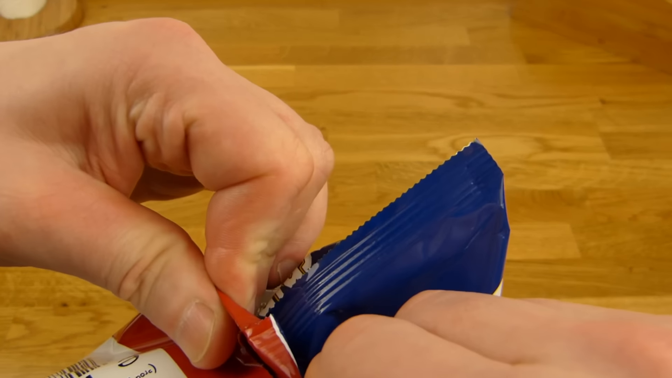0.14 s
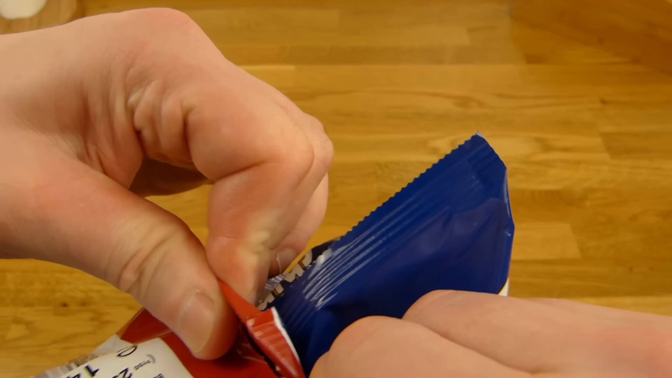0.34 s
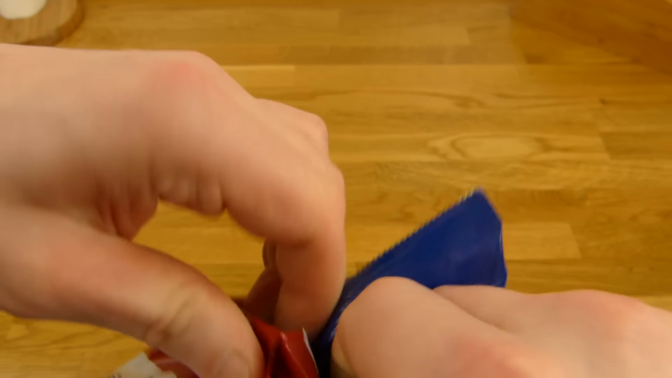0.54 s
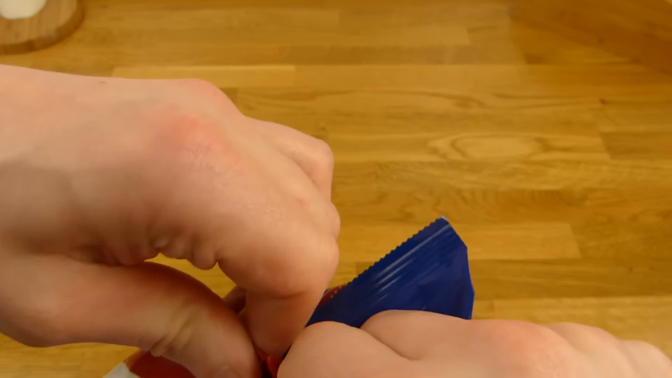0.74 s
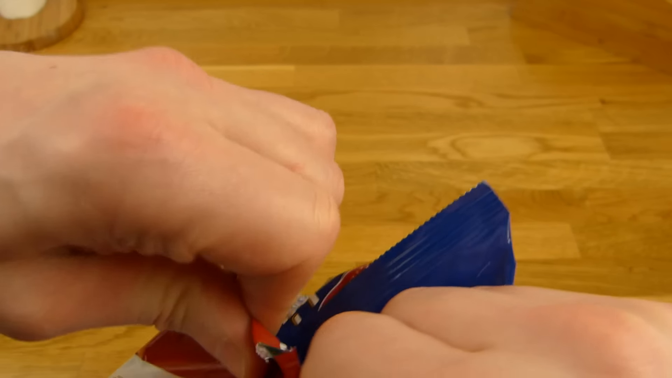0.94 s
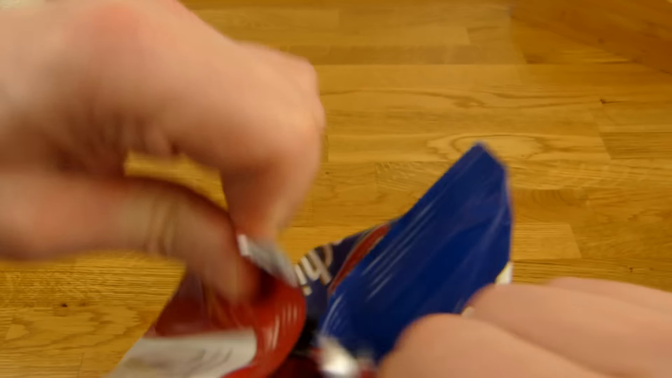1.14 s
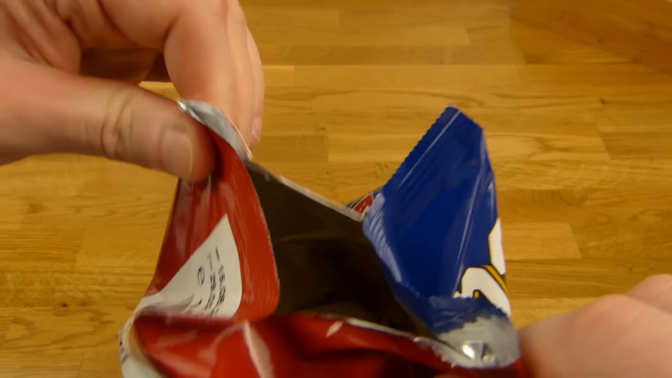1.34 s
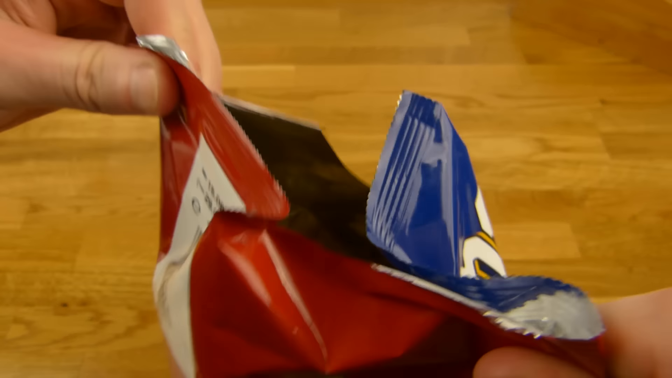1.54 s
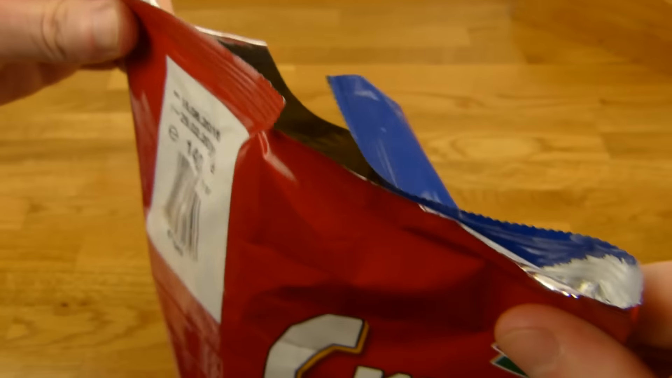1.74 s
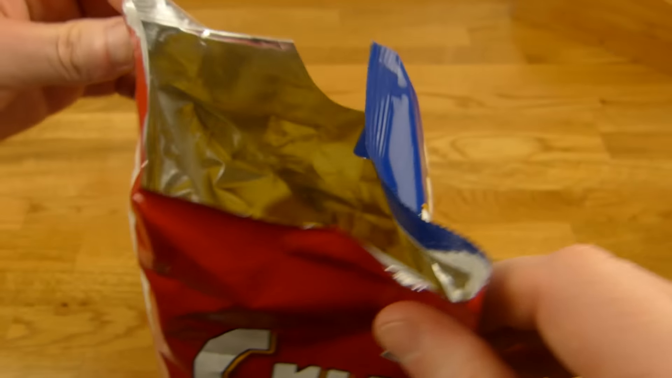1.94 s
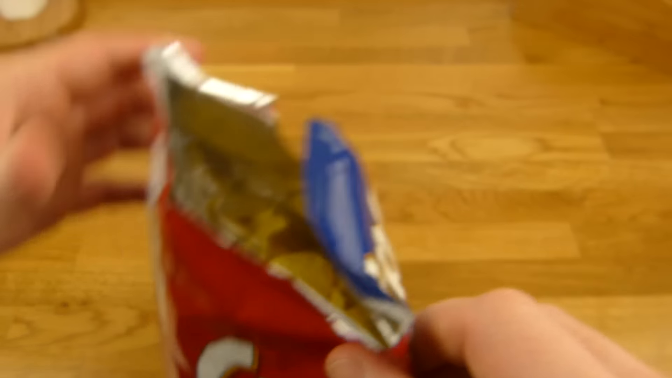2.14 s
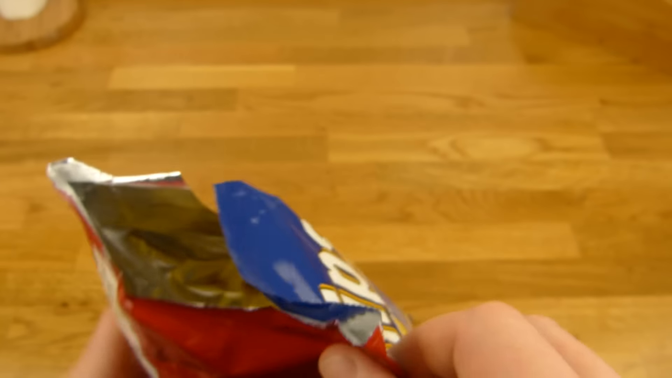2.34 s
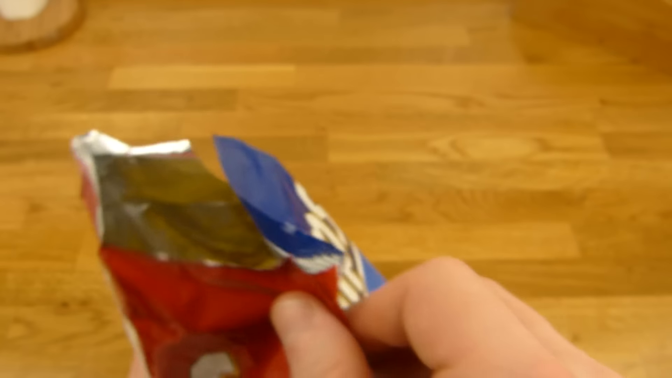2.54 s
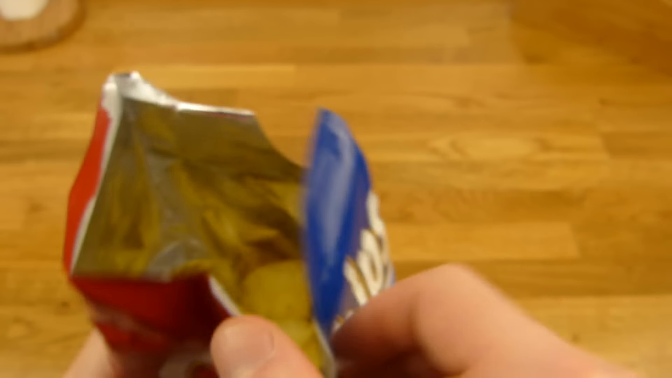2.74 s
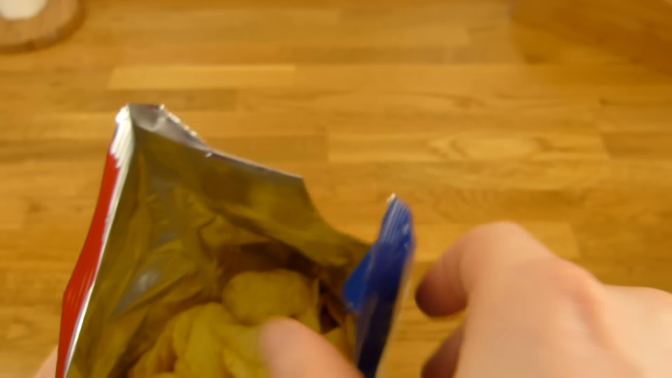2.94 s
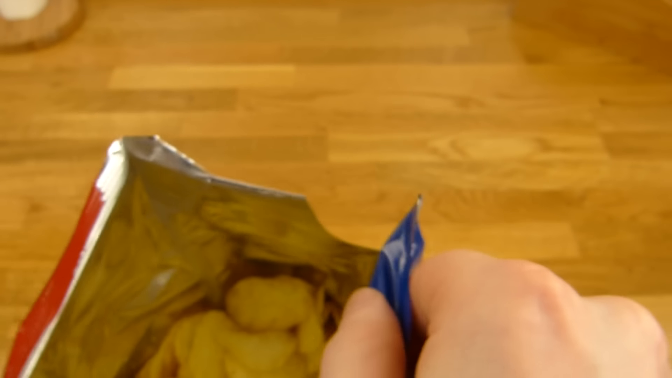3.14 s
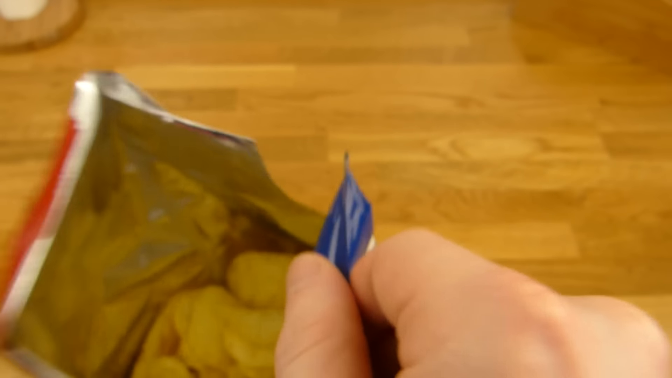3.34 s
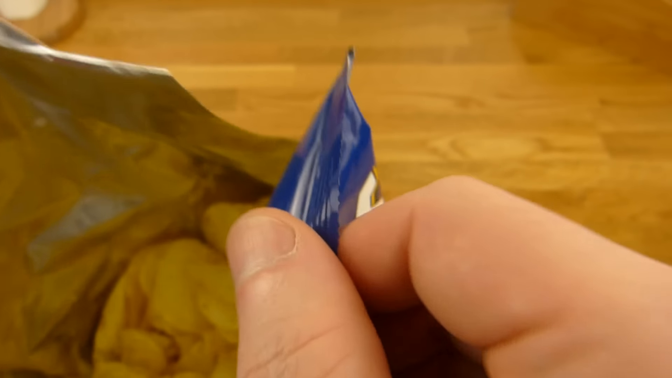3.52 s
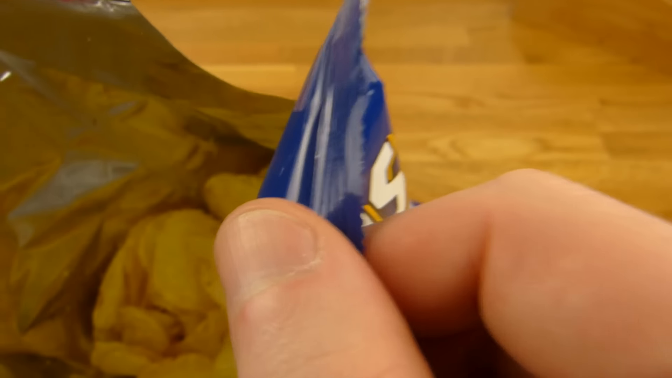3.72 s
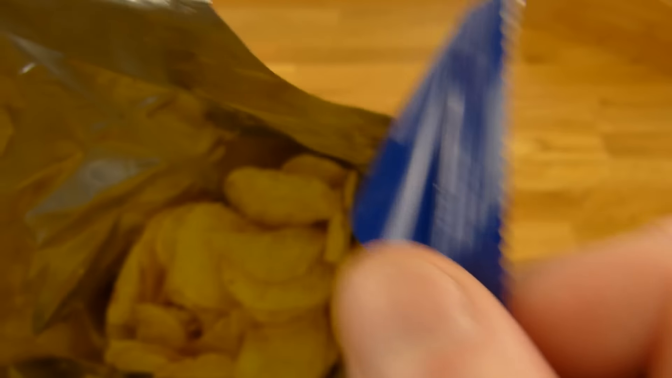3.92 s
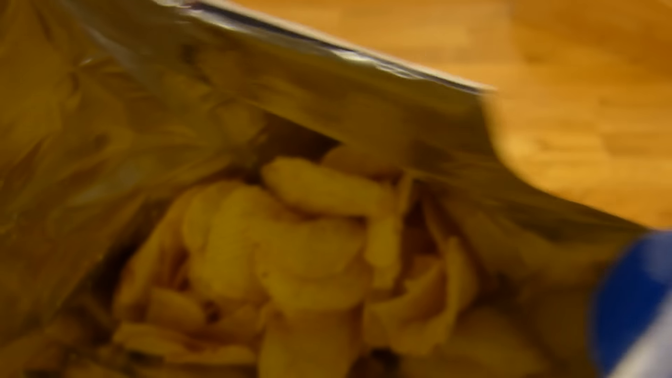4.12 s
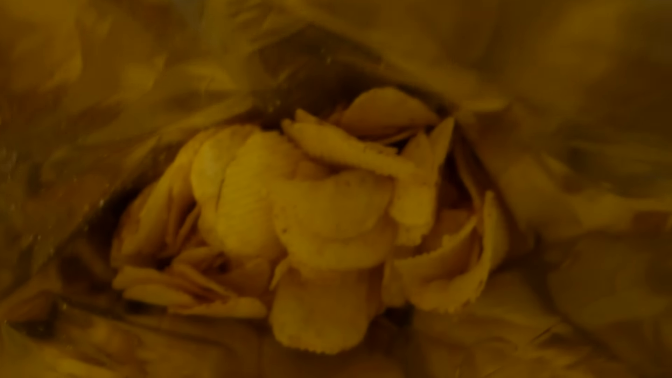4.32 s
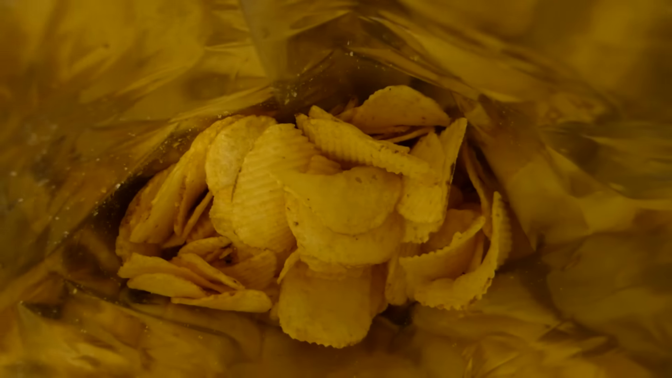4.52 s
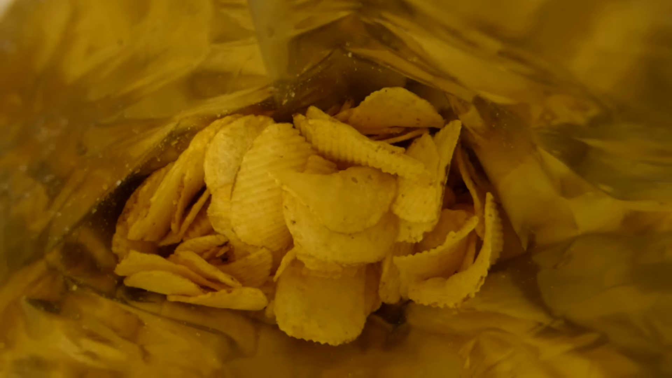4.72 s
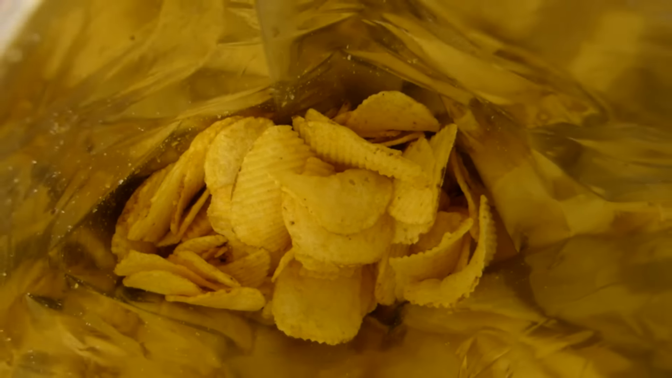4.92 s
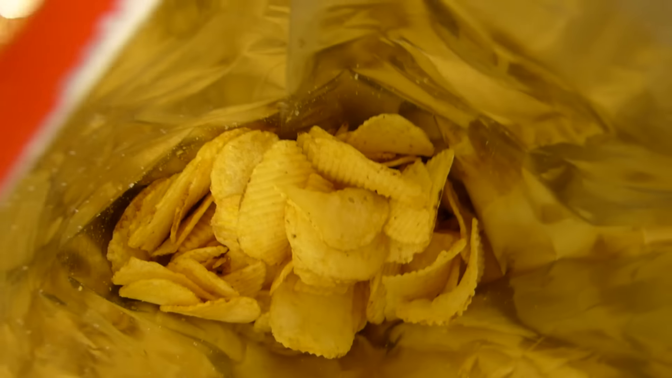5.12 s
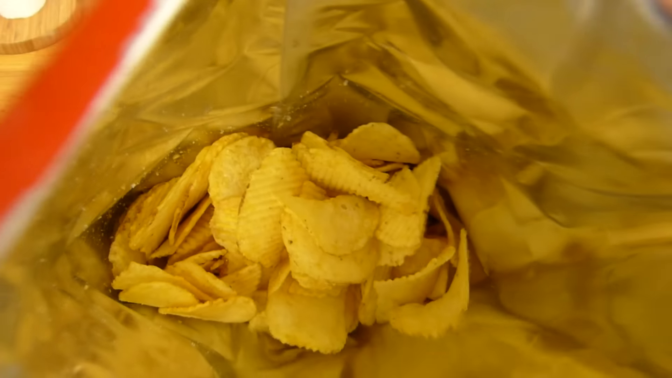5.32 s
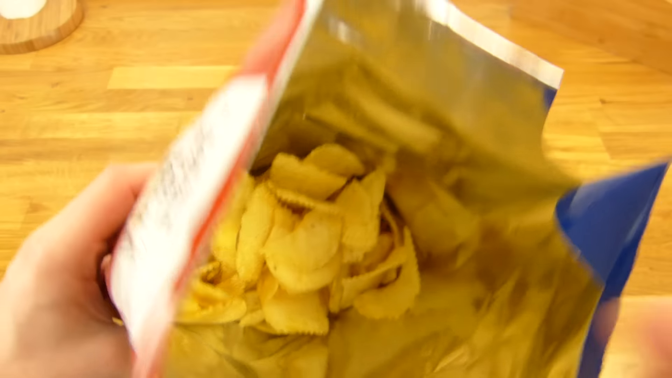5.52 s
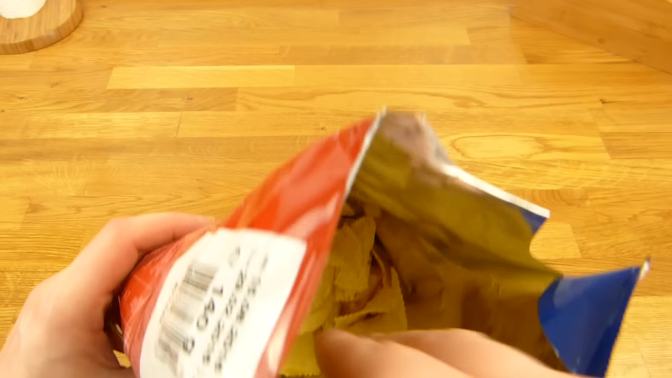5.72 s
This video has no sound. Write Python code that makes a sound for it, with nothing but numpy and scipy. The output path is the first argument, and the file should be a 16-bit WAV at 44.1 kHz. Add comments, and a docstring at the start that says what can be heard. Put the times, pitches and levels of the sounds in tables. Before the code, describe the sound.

Hands rip a crisp packet's seam in a quick zippery fizz, then spread and turn the stiff foil: irregular bright snaps, fine crackle, a few hollow pops and short pings. The bag adds a tight rattle and the small room a short tail. Handling thins out after about three and a half seconds, flares twice briefly, and otherwise leaves quiet room noise.

```python
"""A foil-lined snack packet is torn along its seam, pulled open and turned in the hands close to a stereo microphone.
The seam lets go in fast stick-slip jerks; then creases in the stiff film buckle with sharp snaps over fine crackle,
with hollow pops of panels and pings that ring on from some snaps. Each event is a click that rings short resonances.
The clicks hum and rattle in the bag and die away in a small furnished room, over steady background noise."""
import sys
import numpy as np
from scipy import signal
from scipy.io import wavfile

SR = 44100
rng = np.random.default_rng(int(sys.argv[2]) if len(sys.argv) > 2 else 0)


def transcribe(u):
    """Save the signal u as a 16-bit wav file named by the first command-line argument.

    u: samples, shape (n,) or (channels, n), limited to [-1, 1]; the rate is SR.
    q: integer samples, one column per channel.
    """
    v = np.clip(np.atleast_2d(u).T, -1, 1)
    q = np.round(v * 32767).astype(np.int16)
    wavfile.write(sys.argv[1], SR, q)


N = 254456

SEAM_END_S = .44   # until then the crackle is finer and brighter

# the packet moves about: most to the left near 3.7 s, slightly right near 5.45 s, then centred:
# (time [s], left-right difference [dB])
LEAN = [(0, 0.5), (1.3, 0.6), (2.3, 0.8), (3.0, 0.7), (3.7, 2.5), (4.3, 0.3), (5.0, 0), (5.45, -1),
        (5.77, 0)]


def from_db(db):
    """Turn decibels into an amplitude gain."""
    return 10 ** (np.asarray(db) / 20)


def rms_one(x):
    """Scale to rms 1."""
    return x / np.sqrt(np.mean(x ** 2) + 1e-20)


def at_hz(points, hz):
    """Read a (frequency [Hz], value) table on a log frequency axis."""
    table_hz, values = np.transpose(points)
    return np.interp(np.log(hz), np.log(table_hz), values)


def drift(rate_hz):
    """Slow random wander of rms 1: white noise twice through a one-pole low-pass."""
    r = np.exp(-2 * np.pi * rate_hz / SR)
    wander = signal.lfilter([1], [1, -2 * r, r * r], rng.standard_normal(N + SR))
    return rms_one(wander[SR:])   # the filter has settled by then


def ring(clicks, hz, cycles):
    """A resonance passed twice: a unit click swells to about 1, then dies; each pass loses 60 dB in these cycles."""
    r, w = from_db(-60 * hz / (cycles * SR)), 2 * np.pi * hz / SR
    poles = [1, -2 * r * np.cos(w), r * r]
    passes = [[0.924, 0.015, -0.976, *poles], [0.0084, np.sin(w), -0.0219, *poles]]
    return -np.e * np.log(r) * signal.sosfilt(passes, clicks)


def seam():
    """Stick-slip jerks of the tearing seam ring the taut film; as it slackens, the balance of its pitches falls."""
    # jerks slow down and speed up again: (time [s], rate [jerks per s])
    slip_rate = [(0, 282), (.036, 333), (.044, 250), (.062, 205), (.085, 71), (.128, 111), (.155, 72),
                 (.178, 77), (.195, 108), (.234, 155), (.246, 62), (.29, 287), (.302, 104), (.32, 278)]
    # the jerks weaken as the tear ends: (time [s], level [dB])
    slip_level = [(0, 0.5), (.17, 1.5), (.19, -1), (.32, -5)]
    # film at the tear: (pitch [Hz], level at first [dB], level once slackened [dB])
    seam_rings = [(3070, -24, -30), (6200, -35, -13.5), (7340, -16.5, -18.5), (8000, -15, -27),
                  (10300, -30, -27.5), (11800, -37, -29)]
    start, spread_db = .2, 1.5   # share of a jerk already under way; chance in jerk level
    slack_s, cycles = .11, 8.3   # time to slacken; ringing length

    s, rate = np.transpose(slip_rate)
    time = np.arange(s[-1] * SR) / SR
    jerks = np.cumsum(np.interp(time, s, rate)) / SR + start
    at = np.flatnonzero(np.diff(np.round(jerks)))
    size_db = spread_db * rng.standard_normal(len(at)) + np.interp(at / SR, *np.transpose(slip_level))
    out = 0
    for hz, taut_db, slack_db in seam_rings:
        level_db = np.interp(at / SR, [0, slack_s], [taut_db, slack_db])
        clicks = np.full(N, 1e-18)
        clicks[at] = from_db(level_db + size_db)
        out = out + ring(clicks, hz, cycles)
    return out


def handling(t):
    """Crackle treble, middle and low at times t: tugs and squeezes add up in power, the strongest sets the tone."""
    # each tug or squeeze swells and fades: (time of peak [s], treble level [dB], swell [s], fade [s],
    # middle relative to treble [dB], low relative to middle [dB])
    squeezes = [(0., -22.5, 0.081, 0.24, -16, -11.5), (.31, -25.5, 0.47, 0.21, -25, -4),
                (0.4, -27.5, 0.34, 0.061, -13, -19), (.557, -33.5, 0.12, 0.65, -11, -5.5),
                (.69, -29, 0.2, 0.47, -5, -2), (0.967, -23.5, 0.19, 0.054, -15.5, -14),
                (1.045, -30.5, 0.039, 0.42, -7.5, -9), (1.245, -24, 0.12, 0.23, -3.5, -9.5),
                (1.487, -31, 0.025, 0.52, -2, -8.5), (1.868, -28, 0.19, 0.07, -6, -5),
                (1.955, -42.5, 0.14, 0.23, 3.5, -6), (2.112, -57, 0.036, 0.18, -41, -3),
                (2.215, -36.5, 0.0232, 0.72, 1.5, -1), (2.324, -28, 0.04, 0.13, -2, -11.5),
                (2.604, -29, 0.11, 0.076, -3, -5.5), (2.74, -24.5, 0.075, 0.23, 0, -9),
                (2.918, -24, 0.1215, 0.04, -2.5, -5.5), (3.123, -32, 0.14, 0.039, -2, -5.5),
                (3.186, -28, 0.0722, 0.15, 1.5, -9.5), (3.345, -31.5, 0.0493, 0.18, 1.5, -7),
                (3.405, -25.5, 0.11, 0.083, -1, -8.5), (3.574, -31, 0.23, 0.13, -6.5, -3.5),
                (3.957, -49, 0.21, 0.12, -1, 2.5), (4.03, -46.5, 0.24, 0.22, -7, -5.5),
                (4.29, -30, 0.1, 0.17, -2.5, -6), (4.495, -47, 0.101, 0.17, -3, -6),
                (5.049, -48, 0.15, 0.49, -5.5, -4), (5.146, -33.5, 0.081, 0.066, -7, -4.5),
                (5.355, -51, 0.42, 0.189, -24, 9), (5.464, -32, 0.17, 0.15, -0.5, -2.5),
                (5.55, -36, 0.094, 0.087, -6.5, -5), (5.77, -53, 0.077, .1, -10, -9)]
    span_db = 20   # a swell or fade covers this much

    s, db, swell, fade, mid, low = np.transpose(squeezes)
    late = t[:, None] - s
    drop_db = span_db * np.maximum(late / fade, -late / swell)
    power = from_db(2 * (db - drop_db)) + 1e-30
    total = power.sum(axis=1)
    return 10 * np.log10(total), power @ mid / total, power @ low / total


def crackle():
    """Small creases give way at random, in drifting clumps and sudden crunches; handling sets loudness and tone."""
    # a fistful of film crunches at once: (time [s], crackle rise [dB], time to 1/e of the rise [s])
    crunches = [(.671, 7.5, 0.00722), (.859, 9.5, 0.0036), (1.542, 6, 0.0077), (2.604, 8, 0.0097),
                (2.801, 3.5, 0.0097), (3.123, 8, 0.004184), (3.182, 7.5, 0.0062), (3.334, 7, 0.0056),
                (3.386, 5.5, 0.006), (3.567, 9.5, 0.0051), (5.467, 10.5, 0.011)]
    base_rate = 800   # clicks per s, before the seam, clumps and crunches change it
    clump_db, spread_db = 3, 3.5   # both shrink while the seam tears
    crunch_thins = .8   # the lows lose this share of a crunch's rise

    t = np.arange(N) / SR
    coarse = np.where(t < SEAM_END_S, .3, 1)   # tearing fizzes more densely and evenly
    crunch_db = sum(db * np.exp(-((t - s) / width) ** 2) for s, db, width in crunches)
    rate = base_rate / coarse * from_db(clump_db * coarse * drift(40) + crunch_db)
    born = np.flatnonzero(rng.random(N) < rate / SR)
    crunch_db, coarse, s = crunch_db[born], coarse[born], t[born]

    db, mid, low = handling(s)
    chance = np.minimum(rng.exponential(1, len(born)), 3) - .5   # many faint, few strong
    level_db = db + crunch_db + spread_db * coarse * chance
    low_db = mid + low - crunch_thins * crunch_db   # relative to treble, like mid
    pan = np.interp(s, *np.transpose(LEAN))
    ring_hz = 500 * 2 ** rng.uniform(0, 4.347, len(born))
    return np.transpose([s, level_db, mid, low_db, pan, ring_hz])   # rows for film()


def film(rows, solid):
    """Clicks ring all patches of film, most those near their own pitch.

    Solid cracks alternate sign from patch to patch, crackle takes random signs.
    """
    # how strongly patches sound: (frequency [Hz], level [dB])
    patch_level = [(90, -41), (150, -36), (250, -27.5), (450, -26), (900, -13.5), (1700, -15.5),
                   (3000, -14), (5000, -10.5), (7500, -7.5), (10000, -16.5), (13000, -42), (15500, -32)]
    # patches lie left or right: (frequency [Hz], mean left-right difference [dB], scatter [dB])
    sides = [(110, -2, 0), (376, 2.5, 9), (690, 0.5, 2.5), (2400, -1, 3.5), (4400, -1, 5),
             (8000, -0.5, 2.5), (12000, -1, -3)]
    # changing highest treble: (time [s], level [dB])
    air_level = [(0, -3), (.2, -3), (.33, 2), (.5, 0), (.75, 4.5), (1.25, 11), (1.75, 6), (2.25, 9),
                 (2.75, 5), (3.25, 6.5), (3.75, -2), (4.25, -1), (5.1, 4), (5.77, -1)]
    # centres of low, middle, treble and air: (frequency [Hz])
    tone_hz = [600, 2200, 6500, 13000]
    seam_air_db, solid_air_db = 9, -4.5   # brighter tear; cracks have less air than crackle
    cycles, favour_db, favour_octaves = 6.77, 6.5, .32   # ringing; lift and width round a click's own pitch
    run_s = .0008 if solid else .00033   # time a crease takes to run across the patches
    spread_db = 3.5 if solid else 2.5
    lead = .8   # low patches start early, so that low and high pitches peak nearly together

    s, db, mid, low, pan, ring_hz = rows.T
    side_hz, side_db, scatter_db = np.transpose(sides)
    air = seam_air_db * (s < SEAM_END_S) + solid_air_db * solid + np.interp(s, *np.transpose(air_level))
    pitches, out = np.geomspace(90, 15500, 32), np.zeros((2, N))
    luck = rng.standard_normal((len(s), len(pitches), 3))   # strength, sign, place
    reached = s[:, None] + run_s * rng.random((len(s), len(pitches)))
    for k, hz in enumerate(pitches):
        early = lead * cycles / (np.log(1000) * max(hz, tone_hz[0] / 2))
        at = np.clip(((reached[:, k] - early) * SR).astype(int), 0, N - 1)

        # the four tone regions cross-fade; treble is the reference, so it adds nothing
        shares = [at_hz(list(zip(tone_hz, row)), hz) for row in np.eye(len(tone_hz))]
        tone_db = shares[0] * low + shares[1] * mid + shares[-1] * air + at_hz(patch_level, hz)
        near_db = favour_db * np.exp(-(np.log2(hz / ring_hz) / favour_octaves) ** 2)
        strength = from_db(db + tone_db + near_db + spread_db * np.tanh(luck[:, k, 0]))
        sign = np.sign(luck[:, 0, 1]) * (-1) ** k if solid else np.sign(luck[:, k, 1])

        place_db = pan + np.interp(hz, side_hz, side_db) + np.interp(hz, side_hz, scatter_db) * luck[:, k, 2]
        left_right = from_db(np.outer([.5, -.5], place_db))
        clicks = np.full((2, N), 1e-18)
        np.add.at(clicks, (slice(None), at), left_right * strength * sign)
        out += ring(clicks, hz, cycles)
    return out


def noise_bands(size):
    """Half-octave bands of stereo noise with the room's left-right likeness: (centre Hz, left and right)."""
    # how alike the two sides are: (frequency [Hz], likeness [0 to 1])
    likeness = [(40, 0.32), (250, 0.044), (1000, 0.66), (4000, 0.7), (8000, 1), (12000, 1)]
    edges = 25 * 2 ** np.arange(0, 9.6, .5)
    white = rng.standard_normal((2, 2, size))   # neighbouring bands use different noise
    for k, (low, high) in enumerate(zip(edges, edges[1:])):
        band = signal.butter(2, [low, high], "band", fs=SR, output="sos")
        mid, side = signal.sosfilt(band, white[k % 2])
        hz = np.sqrt(low * high)
        alike = np.clip(at_hz(likeness, hz), 0, 1)
        yield hz, np.sqrt(1 + alike) * mid + np.sqrt(1 - alike) * side * [[1], [-1]]


def hush():
    """Steady room and microphone noise, shaped band by band."""
    # colour of the noise: (frequency [Hz], relative band gain [dB])
    colour = [(25, 2), (50, -6.5), (120, -1.5), (300, 3.5), (900, -3), (2500, -10.5), (7700, -12.5),
              (16000, -21)]
    level_db = -63   # rms
    noise_sum = sum(from_db(at_hz(colour, hz)) * noise for hz, noise in noise_bands(N))
    return from_db(level_db) * rms_one(noise_sum)


def pops():
    """Hollow pops of panels, and pings that ring on from some loud snaps, each one resonance at its own pitch."""
    # pops and pings: (time [s], peak level [dB], pitch [Hz], cycles to lose 60 dB in each pass of the resonance)
    pops_and_pings = [(0.032, -29, 910, 10), (0.174, -33, 1750, 14), (.648, -29.5, 480, 7.6),
                      (1.1229, -4.5, 4310, 7.7), (1.1878, -8, 2450, 5.3), (1.233, -32, 405, 5),
                      (1.2348, -1, 5900, 13), (1.2355, -10, 2500, 17), (1.465, -32, 397, 5.7),
                      (1.479, -35, 423, 23), (1.539, -32, 430, 8), (1.617, -26, 910, 10),
                      (2.102, -24, 1660, 17), (2.237, -19, 1030, 9), (2.575, -34, 273, 7.6),
                      (3.569, -20, 800, 7.9), (3.696, -25, 770, 10.4), (3.9445, -39, 451, 8.8),
                      (3.9795, -35.5, 782, 7.5), (3.987, -32, 776.5, 8), (4.0055, -37, 750, 9.6),
                      (4.025, -45, 714.4, 7), (4.0655, -37, 850, 5.6), (4.371, -36, 850, 5.6),
                      (4.954, -42, 880, 9), (5.2385, -34, 1360, 24), (5.555, -25, 960, 11)]
    out, size = np.zeros(N + SR), SR // 8
    for s, db, hz, cycles in pops_and_pings:
        at = round(s * SR)
        out[at:at + size] += from_db(db) * ring(signal.unit_impulse(size), hz, cycles)
    return out[:N]


def snaps(count=3):
    """Loud creases buckle, each followed by a few weaker neighbours of like tone; both are rows for film()."""
    # creases: (time [s], treble level [dB], middle relative to treble [dB], pitch [Hz])
    creases = [(0.1758, -14, -5.5, 3850), (0.24, -15, -26, 7520), (0.39, -3, -9.5, 6500),
               (0.5019, -32, -17, 7130), (0.511, -23, -10, 7320), (0.518, -28, -20, 6500),
               (.544, -17, -12, 8020), (0.5515, -15, -3, 6570), (0.5583, -18, 5, 910),
               (0.5842, -7.5, -4.5, 4800), (0.5974, -8.5, -10, 6100), (0.612, -15, 4.5, 1000),
               (0.6308, -13.5, 3, 5200), (0.6508, -22, 4, 4000), (.662, -19, -8, 6500),
               (0.6712, -7, -0.5, 5370), (0.7168, -9.5, -8, 6080), (0.7256, -4.5, -8, 8900),
               (0.785, -15.5, -10, 3960), (0.808, -11.5, -4.5, 4700), (.858, -10.5, 6.5, 7760),
               (0.8746, -12, 0, 5800), (0.9662, -29, -16, 6280), (0.9803, -11.5, -8.5, 3970),
               (1.0331, -4.5, -10.5, 7550), (1.0587, -15, -24, 8460), (1.073, -24.5, 10, 3900),
               (1.097, -21.5, 5, 1820), (1.1138, -22, 5, 6500), (1.1224, -2, -6.5, 4340),
               (1.1716, -12, -1, 2978), (1.1873, -2, -9.5, 4650), (1.192, -10, -26, 7600),
               (1.2295, -26, 5, 2500), (1.2348, -5.5, 2.5, 8300), (1.246, -21.5, 7, 2420),
               (1.251, -19, -8, 7590), (1.268, -9.5, 0, 6700), (1.273, -12, -5, 7560),
               (1.299, -8.5, 1.5, 5800), (1.351, -14.5, -1, 1910), (1.354, -23, 6, 2300),
               (1.389, -10, -10, 8500), (1.394, -17, -1, 8200), (1.429, -27, 6, 7320),
               (1.47, -14, 2.5, 6080), (1.478, -9.5, 3.5, 7100), (1.495, -14.5, -0.5, 2400),
               (1.5215, -17, 9, 6000), (1.5437, -4.5, -7, 7160), (1.592, -7.5, -10, 6200),
               (1.6285, -7.5, -1.5, 7200), (1.6776, -20, -4, 4860), (1.7136, -14, -23, 6030),
               (1.7399, -11.5, -3, 5600), (1.7682, -14, -1.5, 2530), (1.806, -9.5, -6, 8740),
               (1.826, -18.5, 0, 4110), (1.858, -7, -2, 7340), (1.945, -14.5, -18, 4570),
               (1.9778, -20.5, 0.5, 6000), (2.0336, -30, 5, 1630), (2.07, -31.5, -1, 3998),
               (2.102, -8, -16, 1633), (2.204, -13, -5.5, 5170), (2.2379, -17, 4, 1020),
               (2.262, -18.5, -3, 4240), (2.3025, -17.5, 6.5, 2520), (2.3058, -11, -8, 7550),
               (2.3252, -8.5, -15, 5160), (2.358, -15, -15.5, 10000), (2.3688, -13, 4.5, 4720),
               (2.4274, -15.5, -13, 7400), (2.4551, -26, 9, 1290), (2.4934, -21, -4.5, 1094),
               (2.508, -21, 0, 3250), (2.545, -32, 12, 2190), (2.5559, -15.5, 1, 8100),
               (2.5801, -10.5, -2, 1755), (2.597, -21, 10.5, 5960), (2.6064, 0, -15, 9150),
               (2.616, -15, -8, 4970), (2.685, -7, -6, 2397), (2.703, -15.5, 8, 7600),
               (2.735, -6, -12, 7100), (2.764, -24, -22.5, 8000), (2.8022, -12, -3, 4784),
               (2.8782, -11.5, -5, 4130), (2.895, -13.5, -14, 6210), (2.9085, -13, -15, 6500),
               (2.926, -13, -3, 7000), (3.0368, -16.5, 2, 3139), (3.083, -15, 1, 5230),
               (3.119, -7.5, -6, 3880), (3.188, -15, -1, 5400), (3.2247, -7, 0.5, 1800),
               (3.3466, -7, -9, 2600), (3.3829, -6, -2, 1240), (3.4098, -8.5, 0, 5702),
               (3.4968, -19, -7.5, 8800), (3.514, -11.5, -9, 7630), (3.53, -9, -13, 7800),
               (3.5641, -6.5, 0, 5970), (3.618, -26.5, 0, 4000), (3.636, -22, 6, 4154),
               (3.656, -28, 6, 1773), (3.662, -30, 10.5, 1850), (3.6959, -26, 5, 768.3),
               (3.8862, -33.5, -16, 7606), (3.9453, -6.5, -10.5, 4750), (4.0664, -31, -14.5, 900.5),
               (4.0924, -36, 3, 2289), (4.1079, -28, -6, 6460), (4.1689, -25.5, -14, 5470),
               (4.206, -18.5, -2, 5800), (4.2514, -5, -7, 5610), (4.277, -17.5, 0, 2000),
               (4.284, -9.5, -1, 6950), (4.2999, -12.5, 3, 1650), (4.3356, -23.5, 5.5, 5760),
               (4.359, -21.5, 13, 3400), (4.3706, -31, 12, 861), (4.4386, -28.5, 6.5, 2244),
               (4.4833, -8, -7, 5324), (4.622, -42, -2, 2030), (4.733, -49.5, 7.5, 1495),
               (4.955, -34.5, -4.5, 873), (4.98, -38, -5, 5940), (5.0157, -31.5, -12.5, 6230),
               (5.0363, -44, -10.5, 6970), (5.0635, -23.5, -19.5, 8400), (5.102, -44, -7.5, 5770),
               (5.136, -20.5, -7, 2390), (5.2384, -21.5, 1.5, 2477), (5.2882, -31, -9, 7900),
               (5.3196, -32.5, -0.5, 3270), (5.342, -41, 7, 1300), (5.371, -31, -7, 7667),
               (5.398, -30, 6, 2097), (5.421, -24, -2, 4900), (5.434, -18, -3, 4970), (5.442, -11, -1, 890),
               (5.4667, -6, 0, 4970), (5.4736, -14, -5, 4940), (5.5374, -13.5, -6.5, 5106),
               (5.5559, -28.5, 13.5, 2049), (5.745, -34, -11, 7500)]
    less_low_db = -4   # less low than the crackle round it
    s, db, mid, ring_hz = np.transpose(creases)
    pan = np.interp(s, *np.transpose(LEAN))
    low_db = mid + handling(s)[-1] + less_low_db
    rows = np.transpose([s, db, mid, low_db, pan, ring_hz])

    luck = rng.random((len(s), count, 2))
    after = np.repeat(rows[:, None], count, axis=1)
    after[..., 0] += .001 + .007 * luck[..., 0]   # 1 to 8 ms later
    after[..., 1] -= 16 * (.5 + luck[..., 1])   # 8 to 24 dB weaker
    return rows, after.reshape(-1, rows.shape[1])


def bag_hum(sound):
    """The air in the bag resonates along with the film."""
    # air resonances: (pitch [Hz], gain [dB])
    bag_air = [(394, -50.5), (714, -54)]
    return sum(from_db(db) * ring(sound, hz, cycles=30) for hz, db in bag_air)


def reply():
    """One echo pattern: a short rattle in the bag and off the table, then the room tail dying band by band."""
    # room decay: (frequency [Hz], time to lose 60 dB [s])
    room_t60 = [(300, 0.065), (800, 0.26), (2000, 0.22), (5500, 0.18), (12000, 0.14)]
    bag_t60_s, bag_db, room_db = .014, -3, -4.5
    t = np.arange(SR // 3) / SR
    bag, room = 0, 0
    for hz, noise in noise_bands(len(t)):
        bag = bag + noise * from_db(-60 * t / bag_t60_s) * (t > .0008)
        room = room + noise * from_db(-60 * t / at_hz(room_t60, hz)) * (t > .003)
    return (from_db(bag_db) * rms_one(bag) + from_db(room_db) * rms_one(room)) / np.sqrt(len(t))


def echoes(x, count=8):
    """The bag keeps changing shape: sound cross-fades through a rotation of different echo patterns."""
    shape_s = .05   # from one pattern to the next
    turn = np.arange(N) / (shape_s * SR) % count
    out = 0
    for k in range(count):
        distance = np.abs((turn - k + count / 2) % count - count / 2)
        share = np.cos(np.pi / 2 * np.minimum(distance, 1))
        out = out + signal.fftconvolve(x * share, reply(), axes=1)[:, :N]
    return out


def scene():
    """Packet and its echoes through the microphone's pass band, plus the hush."""
    loud, after = snaps()
    tear, cracks, pings = seam(), film(loud, solid=True), pops()
    rustle = film(np.vstack([after, crackle()]), solid=False)
    hum = bag_hum(rustle + cracks + pings)
    direct = rustle + hum + cracks + pings + tear
    # loud creases face the microphone; they, the pops and pings and the taut seam rattle less in the bag
    inside = rustle + hum + from_db(-4) * cracks + from_db(-8) * pings + from_db(-10) * tear
    mic = signal.butter(3, [71, 15200], "band", fs=SR, output="sos")
    return signal.sosfilt(mic, direct + echoes(inside)) + hush()


def record(dry):
    """Round off the loudest peaks towards a ceiling, then cut the top steeply."""
    ceiling, cutoff_hz = .92, 15800
    rounded = dry / (1 + np.abs(dry / ceiling) ** 4) ** .25
    return signal.sosfilt(signal.ellip(12, .5, 95, cutoff_hz, fs=SR, output="sos"), rounded)


dry = scene()
out = record(dry)
transcribe(out)
```